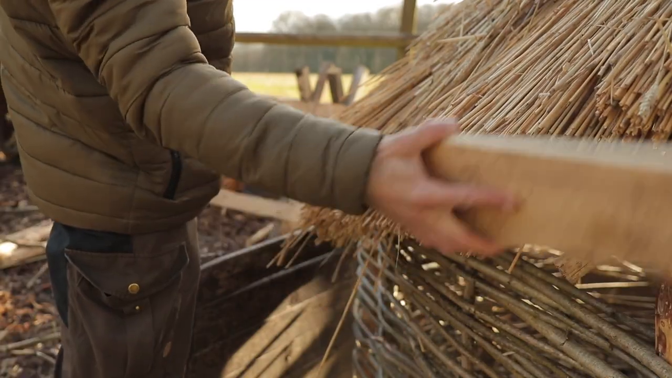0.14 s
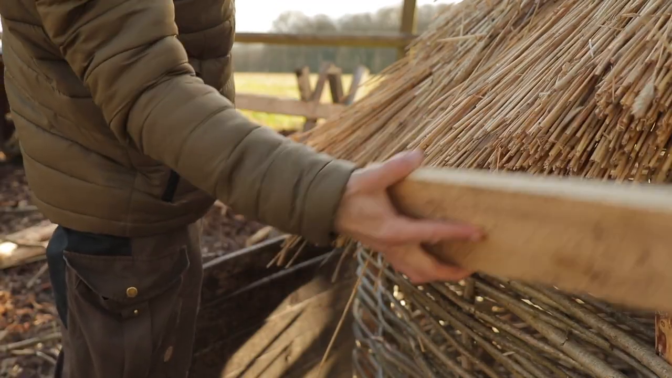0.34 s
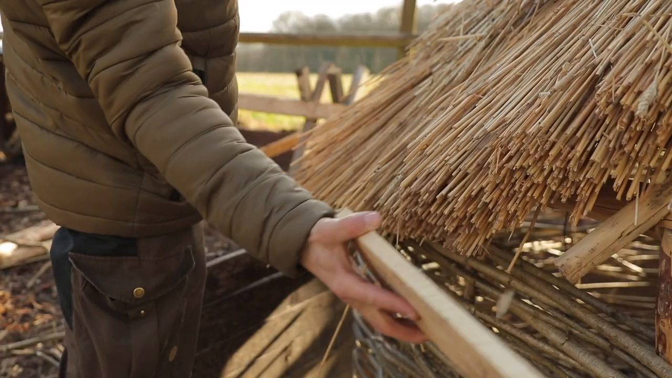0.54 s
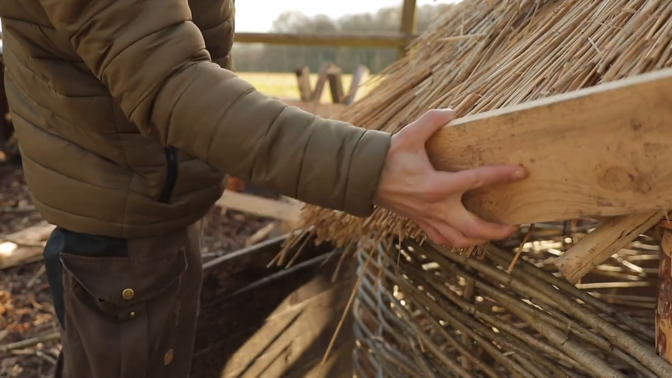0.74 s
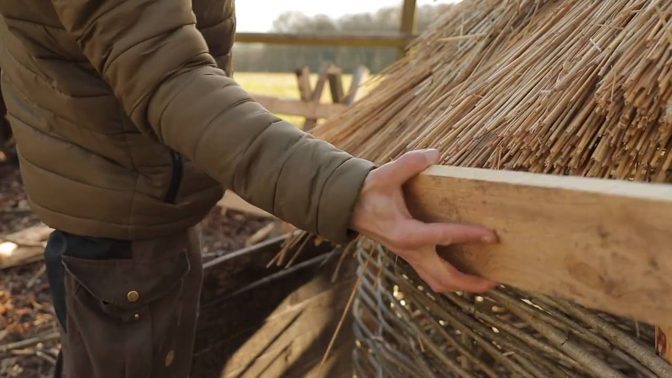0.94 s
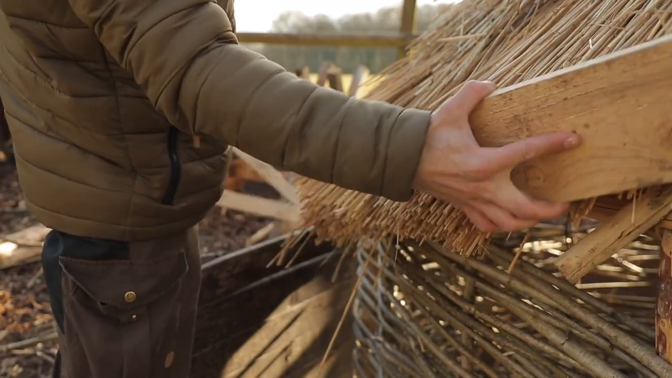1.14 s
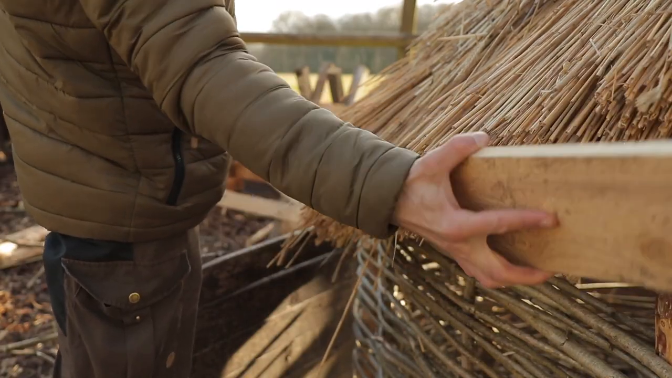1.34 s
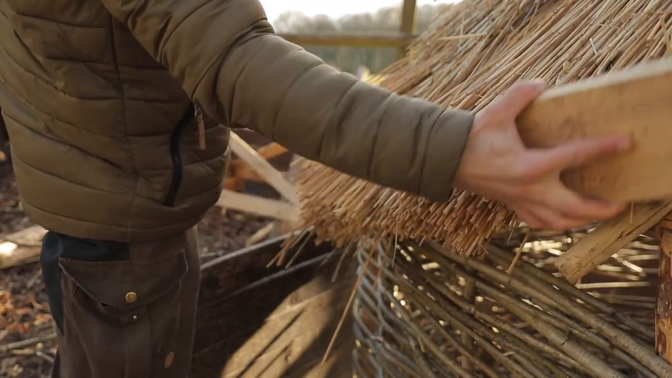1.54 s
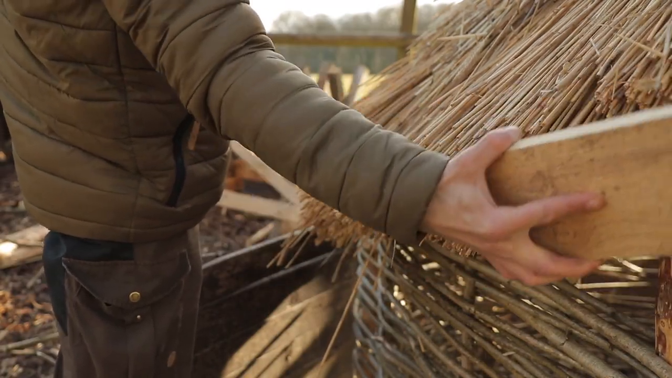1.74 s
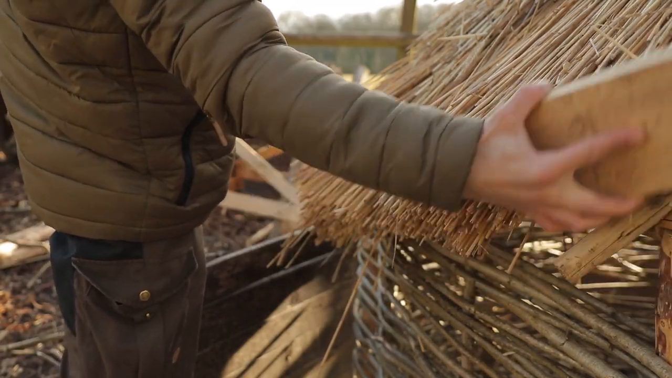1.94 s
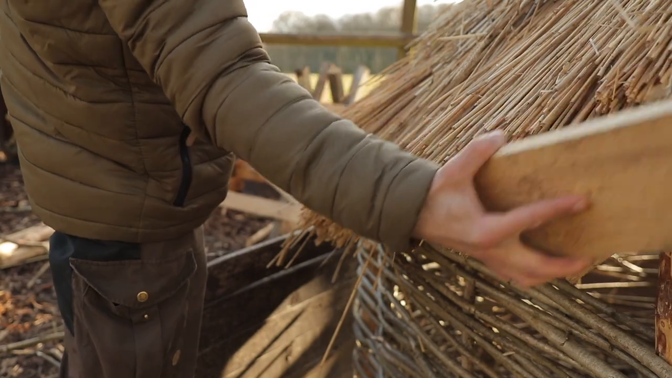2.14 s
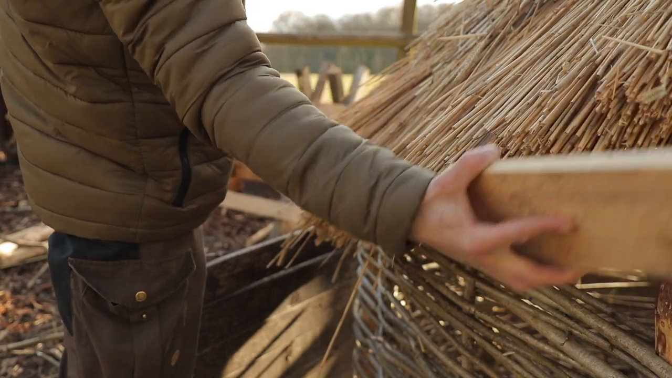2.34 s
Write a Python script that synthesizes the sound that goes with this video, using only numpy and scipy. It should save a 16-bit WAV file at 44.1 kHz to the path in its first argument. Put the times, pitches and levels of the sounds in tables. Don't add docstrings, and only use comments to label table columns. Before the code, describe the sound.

Five close, dry wooden knocks of a board on thatch reeds, with rustling straw between

```python
import sys
import numpy as np
from scipy import signal
from scipy.fft import rfft, irfft
from scipy.io import wavfile

SR = 44100
rng = np.random.default_rng(int(sys.argv[2]) if len(sys.argv) > 2 else 0)


def output_pcm(signal):
    pcm = np.clip(np.atleast_2d(signal).T, -1, 1) * 32767
    wavfile.write(sys.argv[1], SR, np.round(pcm).astype(np.int16))


def volts_from_db(level):
    exponent = np.asarray(level, float) / 20
    return 10 ** exponent


N = 105840


def evened(x):
    return x / np.sqrt(np.mean(x ** 2) + 1e-20)


def read(points, hz):
    f, value = np.transpose(points)
    return np.interp(np.log(hz + 1), np.log(f + 1), value)


def add(mix, s, sound):
    part = mix[round(s * SR):][:len(sound)]
    part += sound[:len(part)]


def coloured(x, db_at):
    gain = volts_from_db(db_at(np.fft.rfftfreq(len(x), 1 / SR)))
    return irfft(rfft(x) * gain, len(x))


def bell(hz, octaves):
    return lambda f: np.maximum(-6 * (np.log2((f + 1) / hz) / octaves) ** 2, -60)


def patter(count, per_s):
    u, e, sign = rng.random((count, 3)).T
    size = -np.log(e + 0.00063)
    return (u < per_s / SR) * np.sign(sign - .5) * size


def ring(hz, db, t60):
    t = np.arange(8000) / SR
    return volts_from_db(db - 60 * t / t60) * np.sin(2 * np.pi * hz * t)


def burst(hz, t60, octaves):
    puff = evened(coloured(rng.standard_normal(4000), bell(hz, octaves)))
    return puff * volts_from_db(-60 * np.arange(4000) / SR / t60)


# (frequency [Hz], level [dB], t60 [s])
BOARD_MODES = [(246, -7, 0.014), (378, -5, 0.08), (590, -11, 0.22), (660, 3.5, 0.11), (851, 2.5, 0.036),
               (990, 0.5, 0.13), (1239.5, 2.5, 0.09), (1476, 6.5, 0.045), (1922, 4, 0.045),
               (2440, -13, 0.054), (2679, 1.5, 0.025), (3100, -2, 0.017), (3743, -1, 0.025),
               (4830, -16.5, .025)]
SPOT_HZ = (228, 370, 548, 635, 850, 1010, 1235, 1468, 1895, 2320, 2725, 3100, 3753, 4920)
# (frequency [Hz], density [dB per Hz])
CRACK_COLOUR = [(88, -37.5), (150, -23.5), (624, -0.5), (888, 5), (1480, 0.5), (2310, -15.5), (3160, -6),
                (3490, -23), (16000, -46)]
CONTACTS_PER_S, SPREAD_DB, SWELL = 5000, 2.68, 2.2
BASS_LATE_HZ, CRACK_LOW_HZ = 390, 2570
GRIP_SHARE, FREE_DB = 0.42, -7
LEFT_DB, GRIP_S, GRIP_DELAY_S = -10.5, 0.00092, 0.007
EARLY_CRACK_DB, CRACK_TAIL_DB, CRACK_T60_S = -8, -11.5, 0.063
PUSH_S, FREE_END_HZ, FREE_END_T60_S = 0.0012, 555, 0.15


def blow(first, full, db, first_db, push_db, end_db, spot, tap_db, release, crack_db, spread):
    t = np.arange(9000) / SR
    rise = full - first
    swelling = volts_from_db(first_db * (1 - (t / rise) ** SWELL))
    force = np.where(t < rise, swelling, np.exp(-((t - rise) / release) ** 2))

    hits = patter(count=len(t), per_s=CONTACTS_PER_S)
    hits = np.sign(hits) * volts_from_db(SPREAD_DB * abs(hits))
    hits[0] = volts_from_db(tap_db)

    body = np.zeros(len(t))
    for hz, mode_db, t60 in BOARD_MODES:
        load = (hits * force ** (1 + BASS_LATE_HZ / hz))[:900]
        drive = abs(load @ np.exp(2j * np.pi * hz * t[:900])) + .25 * np.linalg.norm(load)
        mode_db = mode_db + np.interp(np.log(hz), np.log(SPOT_HZ), spot)
        mode = ring(hz, mode_db, GRIP_SHARE * t60) + ring(hz, mode_db + FREE_DB, t60)
        add(body, 0, signal.fftconvolve(load, mode)[:len(t)] / drive)
    grip = 1 / (1 + np.exp(np.clip((rise + GRIP_DELAY_S - t) / GRIP_S, -50, 50)))
    body = body * volts_from_db(LEFT_DB * grip)

    def crack_db_at(hz):
        return read(CRACK_COLOUR, hz) - 20 * np.log10(1 + (CRACK_LOW_HZ / (hz + 1)) ** 2)

    noise = evened(coloured(rng.standard_normal(len(t)), crack_db_at))
    crack = volts_from_db(EARLY_CRACK_DB) * force + np.exp(-((t - rise) / spread) ** 2)
    crack = crack + (t > rise) * volts_from_db(CRACK_TAIL_DB - 60 * (t - rise) / CRACK_T60_S)
    u = (t - rise) / PUSH_S
    push = volts_from_db(push_db) * (1 - u ** 2) * np.exp(-u ** 2 / 2)
    air = volts_from_db(crack_db) * noise * crack - push
    add(air, rise, ring(FREE_END_HZ, end_db, FREE_END_T60_S))
    return volts_from_db(db) * (body / np.sqrt(np.mean(body[:600] ** 2)) + air)


# (first contact [s], full contact [s])
BLOW_S = [(.2240, .2302), (.7546, .7604), (1.1888, 1.1952), (1.6055, 1.6146), (2.0035, 2.0121)]
# (level [dB], first contact below full [dB], air push [dB], ring of the free end [dB])
BLOWS = [
    (-10, -7, -16, -29),
    (-9.5, -23.5, -11.5, -19),
    (-14.5, -10.5, -10, -41.5),
    (-14.5, -2, -8, -38),
    (-11.5, -13.5, 9, -22.5),
]
SPOTS_LOW = [(-9.5, -3, -7.5, 8, -20), (7.5, -6, -6, -9, 10.5), (5, 6, -12, -4.5, -2),
             (13, -3.5, -19, -5, 2), (-6, 2.2, 18, -8.5, -9)]
SPOTS_HIGH = [(-0.5, -8.5, 5.5, 0.9, -7.5), (-4.5, -2.5, -0.5, -8.5, -4.5), (-0.5, 3.5, 1.5, 6, -7),
              (1.5, 2.5, -1.5, 8, -10), (-4.5, -7, -3, 1.5, 5)]
SPOTS_TOP = [(2.5, -1.7, -0.5, 6.2), (6, 10.5, 3.5, 2.2), (-3.5, 4.5, 1.1, .1), (-3.5, -1.5, 3, .1),
             (1.3, 3, -3.5, 2)]
# (first reed's tap [dB], release [s], crack [dB], crack spread [s])
LANDINGS = [(-0.5, 0.0042, -5.5, 0.005), (-7.5, 0.0041, -3, 0.0025), (2.5, 0.0048, -2.5, 0.0022),
            (-2, 0.0054, -4.5, 0.0027), (-3.5, 0.0022, -2.5, 0.0032)]


def blows():
    board = np.zeros(N)
    for times, row, low, high, top, landing in zip(BLOW_S, BLOWS, SPOTS_LOW, SPOTS_HIGH, SPOTS_TOP, LANDINGS):
        add(board, times[0], blow(*times, *row, low + high + top, *landing))
    return board


# (time [s], level [dB], frequency [Hz], t60 [s])
KNOCKS = [
    (.9668, -31, 1500, 0.0034),
    (0.9666, -37, 604, 0.014),
    (1.1779, -22, 1480, 0.046),
    (1.1785, -23.5, 1900, 0.044),
    (1.1774, -23, 3100, 0.032),
    (1.1886, -14.5, 1530, 0.018),
    (1.6062, -16, 1830, .035),
    (2.02, -29.5, 540, 0.069),
]


def knocks():
    board = np.zeros(N)
    for s, db, hz, t60 in KNOCKS:
        add(board, s, -ring(hz, db, t60))
    return board


TOUCH_S = (.6885, .7428, .9663, 1.1783, 1.5985, 1.9975)
# (level [dB], ring [Hz], t60 [s])
TOUCHES = [
    (-62, 3200, 0.049),
    (-36, 2000, 0.059),
    (-42, 1740, 0.018),
    (-33.5, 2400, 0.054),
    (-34, 1200, 0.041),
    (-55, 2800, 0.0305),
]
TOUCH_BOARD_DB, TOUCH_WIDE_DB = -2, -25


def touches():
    board = np.zeros(N)
    for s, (db, hz, t60) in zip(TOUCH_S, TOUCHES):
        wood = sum(ring(f, g - 14 * np.log2(f / hz) ** 2, min(d, t60)) for f, g, d in BOARD_MODES)[:4000]
        stalk = burst(hz, t60, 0.22) + volts_from_db(TOUCH_WIDE_DB) * burst(2 * hz, t60, 1.4)
        add(board, s, volts_from_db(db) * (stalk + volts_from_db(TOUCH_BOARD_DB) * wood))
    return board


EAVES_DB, EAVES_T60_S = -18, 0.071


def eaves(x):
    t = np.arange(8000) / SR
    near = rng.standard_normal(len(t)) * (t > .004) * volts_from_db(-60 * t / EAVES_T60_S)
    return signal.fftconvolve(x, volts_from_db(EAVES_DB) * near / np.linalg.norm(near))[:N]


# (settling [dB], t60 [s], brush before the blow [dB], brush lead [s], last trickle [dB])
SETTLE = [
    (-36.5, 0.16, -45, 0.012, -62.5),
    (-44.5, 0.16, -40, 0.0099, -61),
    (-40.5, 0.34, -37, 0.014, -65.5),
    (-36.5, 0.21, -44.5, 0.019, -66.5),
    (-40, 0.28, -50, 0.013, -60),
]
# (frequency [Hz], density [dB per Hz])
RUSTLE_COLOUR = [(180, -28.5), (300, 7.5), (360, -14), (656, -3), (856, -14.5), (978, -3), (3640, -5),
                 (16000, -27)]
GRAINS_PER_S, GRAIN_DB, GRAIN_MIX = 1400, 4, 0.28
CLUMP_DB, CLUMP_S = 1.5, 0.027
LAST_T60_S, LAST_HOLD_S, LAST_CLUMP_DB = .6, 0.17, 0


def rustle():
    t, level, last = np.arange(N) / SR, np.zeros(N), np.zeros(N)
    for (first, full), (db, t60, brush_db, lead, last_db) in zip(BLOW_S, SETTLE):
        since = abs(t - full)
        level += (t > full) * volts_from_db(db - 60 * since / t60)
        level += volts_from_db(brush_db) * np.clip((t - first + lead) / (0.54 * lead), 0, 1) * (t <= full)
        last += (t > full) * volts_from_db(last_db - 60 * since / LAST_T60_S - 15.2 * (since / LAST_HOLD_S) ** 4)
    clumps = np.interp(t / CLUMP_S, np.arange(600), rng.standard_normal(600))
    grains = patter(count=N, per_s=GRAINS_PER_S)
    grains = evened(np.sign(grains) * volts_from_db(GRAIN_DB * abs(grains)))
    straw = GRAIN_MIX * grains + (1 - GRAIN_MIX) * rng.standard_normal(N)
    fine = evened(coloured(straw, bell(7000, 1.5)))
    coarse = evened(coloured(straw, lambda hz: read(RUSTLE_COLOUR, hz)))
    return level * volts_from_db(.5 * CLUMP_DB * clumps) * coarse + last * volts_from_db(LAST_CLUMP_DB * clumps) * fine


# (time [s], level [dB], centre [Hz], t60 [s])
SNAPS = [(.002, -54.5, 5550, 0.0055), (.325, -62, 11000, 0.008), (.336, -58, 4500, .008),
         (.377, -60, 4500, .01), (.419, -59, 9000, 0.01), (.4275, -64, 9000, .01), (0.635, -62, 6400, 0.04),
         (.895, -65, 8000, .03), (0.968, -42, 560, 0.022), (0.9676, -48.5, 5840, 0.015),
         (0.979, -58, 2500, 0.015), (1.349, -59.5, 10100, 0.023), (1.365, -56.5, 9000, 0.011),
         (1.378, -66, 11000, 0.016), (1.4418, -44.5, 3240, 0.027), (1.517, -62, 6000, .008),
         (1.748, -64.5, 8000, 0.073), (1.788, -60.5, 11500, .012), (1.834, -62.5, 11900, 0.0058),
         (1.937, -65.5, 5940, 0.0036), (2.097, -52.5, 4700, 0.042), (2.179, -67, 10140, .01),
         (2.251, -63.5, 8940, 0.0071), (2.275, -61, 10040, .006), (2.312, -64, 8880, 0.0076),
         (2.344, -63, 9800, 0.0063),
         (.298, -64, 9000, .01), (.309, -64, 4000, .008), (.83, -67, 7000, 0.011),
            (.903, -64, 11000, .008), (.999, -62.5, 4000, 0.0086), (1.328, -67, 9000, .01),
            (1.432, -63, 9000, .008), (1.68, -60, 5930, 0.014), (1.732, -70.5, 10000, 0.013),
            (1.763, -63, 10900, .02), (1.988, -53, 12000, 0.019), (1.9975, -41, 11000, .012),
            (2.117, -64, 10000, .012), (2.143, -65, 8000, 0.013), (2.165, -64.5, 11000, .015),
            (2.21, -66, 8000, .01), (2.227, -72, 13000, .005), (2.396, -66.5, 7050, .008),
            (1.1783, -44, 11000, 0.013), (1.4427, -51, 11000, .02), (0.9683, -49, 297, 0.029)]
SNAP_OCTAVES, SNAP_TOP_DB = 0.78, -18.5


def snaps():
    reeds = np.zeros(N)
    for s, db, hz, t60 in SNAPS:
        fizz = volts_from_db(SNAP_TOP_DB) * burst(11000, t60, 0.53)
        add(reeds, s, volts_from_db(db) * (burst(hz, t60, SNAP_OCTAVES) + fizz))
    return reeds


# (frequency [Hz], level [dB])
STALK = [(2300, -5.5), (3550, 2), (5300, -4.5), (7300, -6), (9800, -26)]
# (time [s], level [dB], pitch share, upper modes [dB per octave], t60 [s])
TICKS = [
    (.1380, -35.5, 1.016, -1, 0.0057),
    (0.3921, -36.5, 0.97, 0.5, 0.0044),
    (0.6325, -44.5, 0.94, 5, 0.0051),
    (1.1103, -52, 0.82, 5.5, 0.0059),
    (1.528, -39.5, 0.93, -3.5, 0.0055),
    (0.7444, -40, 0.6, -7, 0.012),
]


def ticks():
    reeds = np.zeros(N)
    for s, db, share, upper_db, t60 in TICKS:
        modes = sum(ring(f * share, db + g + upper_db * np.log2(f / STALK[1][0]), t60) for f, g in STALK)
        add(reeds, s, modes * np.minimum(np.arange(len(modes)) / 7, 1))
    return reeds


# (time [s], level [dB], frequency [Hz], t60 [s])
RATTLES = [
    (.6335, -43, 3500, 0.023),
    (0.7, -58, 4150, 0.018),
    (0.64, -41, 4030, 0.027),
    (0.638, -49, 3050, 0.05),
    (0.67, -56, 3700, 0.023),
    (.645, -49, 2900, 0.038),
    (1.78, -62, 2330, .1),
    (.636, -50, 2650, .02),
    (0.61, -50, 3600, .02),
]


def rattles():
    reeds = np.zeros(N)
    for s, db, hz, t60 in RATTLES:
        soft_start = np.minimum(np.arange(4000) / 40, 1)
        add(reeds, s, volts_from_db(db) * burst(hz, t60, octaves=0.078) * soft_start)
    return reeds


# (level [dB], last echo [s])
ECHOES = [
    (-55, .075),
    (-55.5, .07),
    (-57, 0.071),
    (-62.5, 0.079),
    (-56.5, 0.1),
]
YARD_T60_S, YARD_FADE_S, YARD_HZ, YARD_OCTAVES = 0.46, 0.0088, 3000, 1.2


def yard():
    answer = np.zeros(N)
    t = np.arange(8000) / SR
    for (first, full), (db, end) in zip(BLOW_S, ECHOES):
        tail = evened(coloured(rng.standard_normal(len(t)), bell(YARD_HZ, YARD_OCTAVES)))
        far_side = 0.13 + 1.4 / (1 + np.exp((t - end) / YARD_FADE_S))
        add(answer, full, tail * (t > .015) * volts_from_db(db - 60 * t / YARD_T60_S) * far_side)
    return answer


# (frequency [Hz], density [dB per Hz])
HUM_COLOUR = [(12, -47.5), (20, -7.5), (91, 1.5), (179, -9.5), (313, -20.5), (549, -20), (1640, -28.5),
              (2640, -42.5), (16400, -64.5)]
# (frequency [Hz], density [dB per Hz])
RUMBLE_COLOUR = [(12, -47), (20, -17), (43, 1), (91, 2.5), (161, -7.5), (247, -19.5), (300, -29),
                 (390, -26), (660, -120)]
# (time [s], hum [dB], rumble [dB])
TRAFFIC_DB = [(0.0, -58, -37.5), (0.17, -59, -45), (0.32, -56.5, -45), (0.63, -58.5, -44),
              (1.49, -58.5, -40), (1.88, -58.5, -44), (2.4, -58.5, -48)]


def traffic():
    s, hum_db, rumble_db = np.transpose(TRAFFIC_DB)
    t = np.arange(N) / SR
    hum = coloured(rng.standard_normal(N), lambda hz: read(HUM_COLOUR, hz) - 30 * (hz < 200))
    low = coloured(rng.standard_normal(N), lambda hz: read(RUMBLE_COLOUR, hz) - 60 * (hz > 200))
    hum = volts_from_db(1.5 + np.interp(t, s, hum_db)) * evened(hum)
    return hum + volts_from_db(-3.0 + np.interp(t, s, rumble_db)) * evened(low)


def far(curve, hz, octaves):
    s, db = np.transpose(curve)
    noise = evened(coloured(rng.standard_normal(N), bell(hz, octaves)))
    return volts_from_db(np.interp(np.arange(N) / SR, s, db)) * noise


# (time [s], level [dB])
ENGINE_DB = [(0, -80.5), (.75, -71.5), (.9, -61.5), (1.1, -66.5), (1.3, -63.5), (1.55, -56), (1.75, -68),
             (2.4, -68)]
# (time [s], level [dB])
TREES_DB = [(0.0, -78.5), (0.32, -66), (0.43, -75), (1.58, -75), (1.77, -72.5), (2.4, -75)]
# (time [s], level [dB])
BIRD_DB = [(0, -100), (2.3, -100), (2.34, -80), (2.4, -76)]


def surroundings():
    engine = far(ENGINE_DB, hz=309.7, octaves=0.039)
    trees = far(TREES_DB, hz=3300, octaves=.38)
    bird = far(BIRD_DB, hz=4400, octaves=.07)
    return traffic() + engine + trees + bird


def scene():
    board = blows() + knocks() + touches()
    board = signal.lfilter(*signal.butter(2, 140, "high", fs=SR), board)
    reeds = rustle() + snaps() + ticks() + rattles()
    return (board + eaves(board) + reeds + yard() + surroundings())[None]


def top_cut(x):
    return signal.sosfilt(signal.butter(12, 16970, fs=SR, output="sos"), x)


CEILING, KNEE, EDGE_HZ = .78, 5.0, 16100


def record(dry):
    soft = dry / (1 + abs(dry / CEILING) ** KNEE) ** (1 / KNEE)
    edge = signal.firwin(255, EDGE_HZ, window=("kaiser", 9), fs=SR)
    return top_cut(signal.oaconvolve(soft, edge[None], "same"))


dry = scene()
out = record(dry)
output_pcm(out)
```